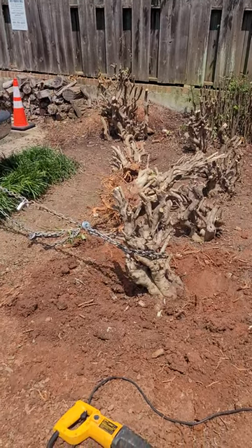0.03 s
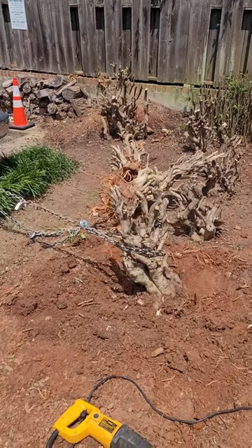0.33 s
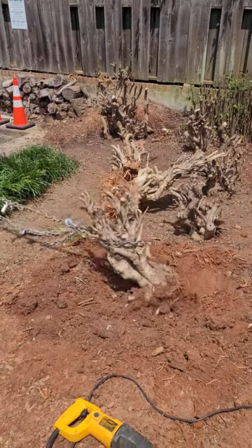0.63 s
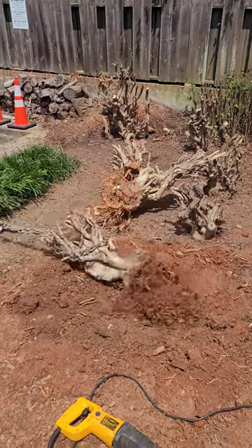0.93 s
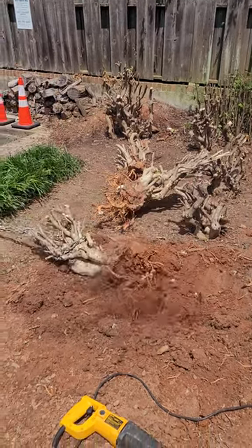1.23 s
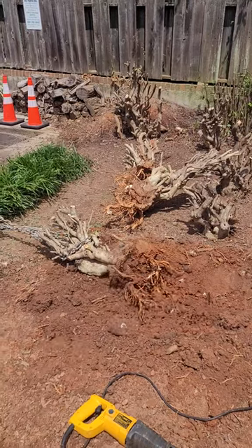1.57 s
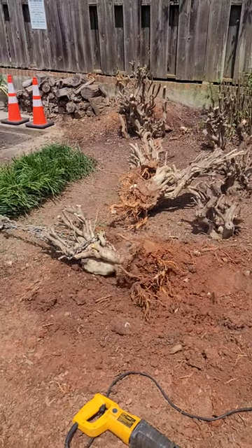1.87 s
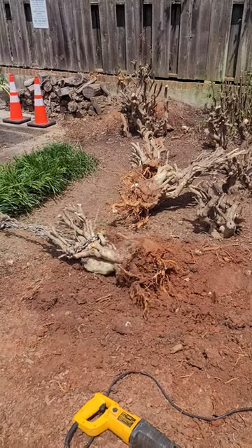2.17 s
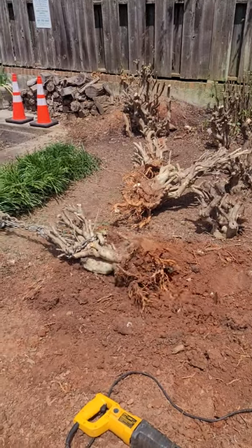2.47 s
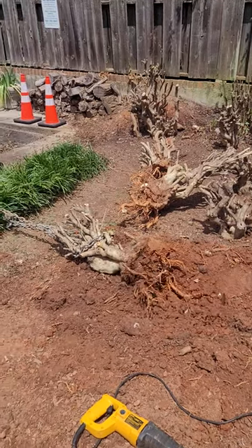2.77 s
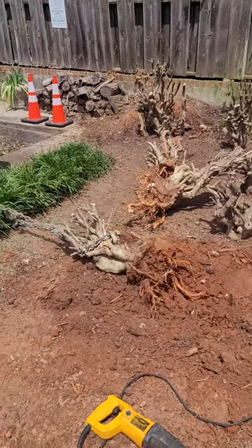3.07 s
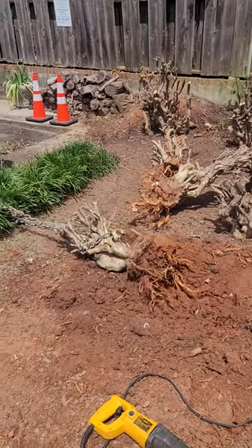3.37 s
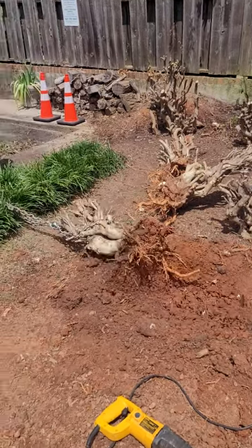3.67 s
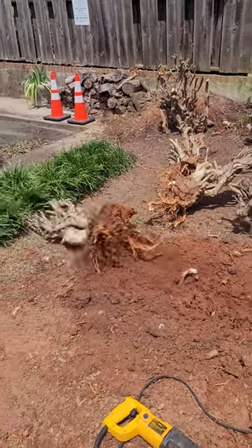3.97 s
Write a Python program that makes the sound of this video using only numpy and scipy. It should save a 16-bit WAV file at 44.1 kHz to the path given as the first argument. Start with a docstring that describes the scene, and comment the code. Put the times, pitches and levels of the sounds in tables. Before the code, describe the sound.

A stump rips out of dry earth in a yard, roots snapping and dirt spraying over a low engine rumble. The engine eases, then revs again, bringing a second, shorter burst of cracking and falling soil.

```python
"""A vehicle drags a stump out of dry clay on a chain, in a fenced yard. The exhaust booms as the
engine begins the first of four surges. Strained roots snap and tear, twigs click, the trunk knocks
and the root ball heaves; clods crumble, soil sprays down, the chain jingles and the stump scrapes
to rest. After a lull the engine pulls again, more roots break, and the chain jingles as the stump
comes free. Throughout, the wooden fence returns a faint, short reflection of the stump's sounds."""
import sys
import numpy as np
from scipy import signal
from scipy.fft import rfft, irfft, next_fast_len
from scipy.io import wavfile
from scipy.ndimage import map_coordinates

SR = 44100
rng = np.random.default_rng(int(sys.argv[2]) if len(sys.argv) > 2 else 0)


def bounce(signal):
    """Save signal as a 16-bit WAV file at the path given by the first command-line argument."""
    frames = np.transpose(np.atleast_2d(signal))
    limited = np.clip(frames, -1, 1)
    pcm = np.round(limited * 32767).astype(np.int16)
    wavfile.write(sys.argv[1], SR, pcm)


N = 4 * SR


# roots breaking, with a level for each band: start_s, thump_db, wood_db, snap_db, splinter_db
ROOT_SNAPS = [(0.477,-50,-22,-36.5,-46), (0.5275,-25,-19.5,-27.5,-48), (0.595,-27,-33.5,-28,-38),
              (0.6234,-54,-28.5,-28.5,-44), (0.642,-28.5,-24,-37.5,-54), (0.709,-60,-32,-30,-33),
              (0.7829,-24,-20.5,-25.5,-27.5), (0.879,-32,-23.5,-32,-38), (0.9585,-52,-24.5,-38,-39),
              (1.469,-53,-40.5,-37,-44.5), (2.69,-61,-26.5,-23.5,-27), (2.7111,-27,-30.5,-43,-53),
              (3.3489,-38,-40,-32.5,-31), (3.5902,-24.5,-27,-40,-30), (3.625,-36,-50,-27,-20.5),
              (3.892,-58,-45,-42.5,-27.5)]
def roots(fibres=7):
    """Brittle fracture: a root sheds its strain in one impulse, then fibres part and a tear dies away."""
    out, t = np.zeros((2, N)), np.arange(SR // 10) / SR
    tear_db, tear_decay_s, fibre_delay_s, left_lag_s = -8, .0039, .00082, .00005
    level_window_s = .0104
    bands_hz = [(200, 800), (800, 2400), (2400, 8000), (8000, 16000)]
    filters = [signal.butter(3, band, "band", fs=SR, output="sos") for band in bands_hz]
    for start_s, *levels_db in ROOT_SNAPS:
        burst = amp(tear_db) * np.exp(-t / tear_decay_s) * rng.standard_normal((2, len(t)))
        delays_s = np.append(0, rng.exponential(fibre_delay_s, fibres)) + np.array([[left_lag_s], [0]])
        sizes = np.append(-1, .52 * rng.uniform(-3.35, 1, fibres))
        sizes = sizes * amp(.75 * rng.standard_normal(delays_s.shape))
        offsets = np.clip(delays_s * SR, 0, len(t) - 1).astype(int)
        burst += [np.bincount(at, size, len(t)) for at, size in zip(offsets, sizes)]
        for k, (sos, level_db) in enumerate(zip(filters, levels_db)):
            band = signal.sosfilt(sos, burst if k else burst.mean(0, keepdims=True))  # mono thump
            rms = np.sqrt(np.mean(band ** 2, 0).sum() / (level_window_s * SR))
            add(out, start_s, (-1) ** k * amp(level_db) * band / rms)
    return out


# knocks of the trunk: start_s, pitch_hz, level_db
KNOCKS = [(.528, 432, -16), (.879, 408, -13.5), (.958, 270, -15.5), (3.581, 392.7, -16),
          (3.669, 324, -15.5)]
def trunk(t60_s=.047):
    """Damped free vibration: each jerk excites one hollow-sounding mode of the heavy stump."""
    out, t = np.zeros((2, N)), np.arange(SR // 10) / SR
    for start_s, pitch_hz, level_db in KNOCKS:
        add(out, start_s, amp(level_db - 60 * t / t60_s) * np.sin(2 * np.pi * pitch_hz * t)[None])
    return out


# thin roots and twigs clicking: start_s, level_db
TWIG_CLICKS = [(.333, -26), (.493, -22), (.672, -24), (.69, -28), (.729, -25), (.766, -22), (.937, -30),
               (1.01, -24.5), (1.03, -28), (1.054, -23), (1.141, -25), (1.238, -34), (1.313, -31),
               (1.323, -30), (1.363, -31), (3.511, -19), (3.548, -27), (3.669, -23)]
# spectrum of a click: frequency_hz, gain_db
TWIG_SPECTRUM = [(400, -3.5), (1900, 3.5), (4500, -4), (16000, -25)]
def twigs(decay_s=.005, median_hz=1900):
    """Impulse response: each twig clicks and rings for an instant at its own natural frequency."""
    out, t = np.zeros((2, N)), np.arange(SR // 20) / SR
    grit = coloured(stereo_noise(), TWIG_SPECTRUM)
    decay = np.exp(-t / decay_s)
    for start_s, level_db in TWIG_CLICKS:
        pitch_hz = median_hz * np.exp(.25 * rng.standard_normal())
        ring = 1.2 * np.sin(2 * np.pi * pitch_hz * t + rng.random((2, 1))) * decay
        click = grit[:, round(start_s * SR):][:, :len(t)]
        add(out, start_s, amp(level_db) * decay * (click + ring))
    return out


# clods and rootlets breaking up: time_s, level_db
CRUMBLE = [(.57, -61), (.61, -33.5), (1.03, -35), (1.1, -62), (1.15, -41), (1.32, -47), (1.42, -58.5),
           (3.15, -53), (3.48, -37), (3.66, -29.5), (3.74, -47)]
# spectrum of the crumbling: frequency_hz, gain_db
CRUMBLE_SPECTRUM = [(100, 3.5), (1100, 0), (1900, -1), (5500, -22), (16000, -22)]
# fine soil spraying: time_s, level_db
SPRAY = [(.55, -58), (.7, -40), (.97, -36.5), (1.09, -58), (1.13, -37), (1.2, -37.5), (1.42, -70),
         (3.1, -66), (3.35, -40), (3.64, -36), (3.71, -49), (4, -43.5)]
# spectrum of the spray: frequency_hz, gain_db
SPRAY_SPECTRUM = [(1000, -13), (4000, 7), (8000, 0), (12500, 6.5), (16000, 5)]
def soil():
    """Superposition of random ticks: breaking clods and rootlets crackle, the denser spray hisses."""
    crumble_db, = curves(CRUMBLE)
    spray_db, = curves(SPRAY)
    rootlets = grains(per_second=1800, scatter_db=4.5, quality=4)
    crumbs = grains(per_second=12000, scatter_db=3, quality=7)
    crumble = amp(crumble_db + 1.2 * wobble(110)) * coloured(rootlets, CRUMBLE_SPECTRUM)
    spray = amp(spray_db + 3.3 * wobble(60)) * coloured(crumbs, SPRAY_SPECTRUM)
    return crumble + spray


# heaves of the root ball: peak_s, width_s, level_db
HEAVES = [(.89, 0.13, -29), (3.63, 0.088, -31)]
def root_ball():
    """Amplitude modulation: a low band of noise swells and fades as the root ball heaves."""
    envelope = sum(amp(level_db) * swell(peak_s, width_s) for peak_s, width_s, level_db in HEAVES)
    return envelope * noise_band(centre_hz=224, width_hz=280)


def scrape(start_s=1.387, decay_s=.048, centre_hz=1037, level_db=-36.5):
    """Sliding friction: a band of noise decays as the stump comes to rest."""
    t = np.arange(N) / SR - start_s
    envelope = amp(level_db) * (t > 0) * np.exp(-abs(t) / decay_s)
    return envelope * noise_band(centre_hz, centre_hz / 2)


# jingles of the chain: start_s, length_s, tap_level_db
JINGLES = [(1.02, .19, -43), (3.823, .16, -44)]
def chain(taps=64, mean_hz=14750, t60_s=.016):
    """Impact excitation: slack links tap each other and each rings at its own natural frequency."""
    out, t = np.zeros((2, N)), np.arange(SR // 10) / SR
    for start_s, length_s, level_db in JINGLES:
        for k in range(taps):
            pitch_hz = mean_hz * (1 + .028 * rng.standard_normal())
            ring = np.sin(2 * np.pi * (pitch_hz * t + rng.random((2, 1))))
            tap_s = start_s + length_s * (k + rng.random()) / taps
            add(out, tap_s, amp(level_db - 60 * t / t60_s) * ring)
    return out


# firing tone of the engine: time_s, firing_hz, fundamental_db, third_harmonic_db
FIRING = [(.12, 58.76, -49.5, -58), (.24, 65.93, -29, -42), (.35, 78.73, -20.5, -30.5),
          (.44, 82.34, -27, -44.5), (.63, 76.94, -26.5, -26), (.75, 67.54, -42, -49),
          (1.15, 53.5, -63, -60), (2.15, 55.95, -47.5, -77), (2.36, 69.97, -28.5, -34.5),
          (2.52, 72.05, -29, -36.5), (2.62, 66.2, -42.5, -46), (2.88, 63.5, -40, -52), (3, 75.53, -23, -24),
          (3.18, 77.83, -23, -25), (3.37, 90.92, -32.5, -63), (3.7, 86.2, -33, -52.5),
          (3.91, 74.9, -27, -26), (4, 66.2, -41, -47)]
# noise of the engine under load: time_s, roar_gain_db, fan_db
LOAD = [(.12, -48.5, -53.5), (.19, -41, -43.5), (.38, -33, -38.5), (.7, -36, -36.5), (1.2, -44.5, -40.5),
        (1.55, -46, -52.5), (2.05, -48, -52.5), (2.42, -36.5, -42), (2.75, -39.5, -46.5), (3.3, -31.5, -40),
        (4, -37, -42.5)]
def engine(cylinders=6):
    """Periodic excitation: cylinders of unequal strength fire in turn, giving harmonics and puffs."""
    firing_hz, fundamental_db, third_db = curves(FIRING)
    roar_db, fan_db = curves(LOAD)
    cycles = np.cumsum(firing_hz * (1 + .006 * wobble(40))) / SR
    phase = 2 * np.pi * cycles
    fundamental = amp(fundamental_db + wobble(45)) * np.sin(phase)
    third = amp(third_db + wobble(45)) * np.sin(3 * phase)
    firings = np.floor(cycles).astype(int)
    cylinder_db = np.take(3 * rng.standard_normal(cylinders), firings, mode="wrap")
    pulses = np.diff(firings, prepend=0) * amp(cylinder_db + 2 * rng.standard_normal(N))
    puffs = stereo_noise() * (1 + .5 * np.cos(phase))
    pipe = exhaust(pulses, puffs, roar_db, fundamental_db)
    return np.sqrt(2) * (fundamental + third) + pipe + intake(puffs, fundamental_db) + fan(phase, fan_db)


# response of the exhaust pipe: frequency_hz, gain_db
PIPE_SPECTRUM = [(20, -96.5), (38, 3.5), (120, 9), (180, 1), (330, 3), (470, -7.5), (560, -26),
                 (850, -21.5), (1200, -42), (3000, -102)]
# booms as the throttle opens: peak_s, level_db
BOOMS = [(0.192, -26.5), (2.245, -25.5)]
def exhaust(pulses, puffs, roar_db, fundamental_db, boom_hz=119.9, boom_width_s=.029):
    """Source and filter: the booming pipe shapes pulses and puffs; upper harmonics rise under load."""
    throb = coloured(pulses, PIPE_SPECTRUM)
    roar = amp(roar_db) * (amp(-2) * throb + amp(4) * coloured(puffs, PIPE_SPECTRUM))
    overtones = amp(fundamental_db - 19) * unit(filtered(throb, lambda hz: hz > 299.6))
    envelope = sum(amp(level_db) * swell(peak_s, boom_width_s) for peak_s, level_db in BOOMS)
    boom = envelope * np.sin(2 * np.pi * boom_hz * np.arange(N) / SR)
    return roar + overtones + boom


# resonances of the intake: pitch_hz, gain_db
INTAKE_MODES = [(664, -1.5), (790, -4), (862, -0.5)]
def intake(puffs, fundamental_db, bandwidth_hz=3.3, relative_db=-23.5):
    """Forced resonance: the puffs drive narrow modes into a drone that follows the firing tone's level."""
    def response(hz):
        return sum(amp(db) / (1 + 2j * (hz - mode_hz) / bandwidth_hz) for mode_hz, db in INTAKE_MODES)
    return amp(fundamental_db + relative_db) * unit(filtered(puffs, response))


# spectrum of the fan: frequency_hz, gain_db
FAN_SPECTRUM = [(800, 3), (2000, -2.5), (4300, -7.5), (8500, -15.5)]
def fan(phase, level_db):
    """Broadband flow noise: the fan's rush swells with the throttle and pulses at the firing rate."""
    rush = coloured(stereo_noise(), FAN_SPECTRUM) * (1 + .12 * np.cos(phase))
    return amp(level_db + 1.6 * wobble(11)) * rush


def yard(x, t60_s=.12, rise_s=.0011, gain_db=-11):
    """Diffuse reflection: the fence and ground scatter a short, thin tail."""
    t = np.arange(SR // 2) / SR
    tail = rng.standard_normal((2, len(t))) * amp(-60 * t / t60_s) * (1 - np.exp(-t / rise_s))
    return amp(gain_db) * signal.fftconvolve(x, tail / np.linalg.norm(tail[0]), axes=1)[:, :N]


# likeness of left and right: frequency_hz, coherence
COHERENCE = [(300, 0.97), (950, 0.31), (4000, 0)]
def spread(pair):
    """Spatial coherence: two unrelated signals mix to left and right, alike at long wavelengths."""
    angle = lambda hz: np.arccos(np.clip(along(COHERENCE, hz), -1, 1)) / 2
    mid, side = filtered(pair, lambda hz: np.array([np.cos(angle(hz)), np.sin(angle(hz))]))
    return np.array([mid + side, mid - side])


def stereo_noise():
    """White noise, coherent in the bass."""
    return spread(rng.standard_normal((2, N)))


def noise_band(centre_hz, width_hz):
    """Noise through a Gaussian passband, at rms 1."""
    return unit(filtered(stereo_noise(), lambda hz: np.exp(-((hz - centre_hz) / width_hz) ** 2)))


def grains(per_second, scatter_db, quality):
    """Shot noise: damped ticks of random moment, pitch and size, with a random phase for each channel."""
    when, pitch, size, *phases = rng.random((per_second * N // SR, 5)).T[:, :, None]
    t = np.arange(256) / SR
    hz = 300 * 50 ** pitch  # 300 Hz to 15 kHz
    strength = amp(-scatter_db * np.maximum(np.log(size), -4)) * hz
    envelope = strength * np.exp(-t * hz * np.pi / quality)
    at = ((when * N).astype(int) + np.arange(len(t))).ravel()
    ticks = [envelope * np.sin(2 * np.pi * (hz * t + phase)) for phase in phases]
    return spread(np.array([np.bincount(at, channel.ravel(), N)[:N] for channel in ticks]))


def coloured(x, spectrum, size=8192):
    """Minimum-phase filtering of x to the given spectrum, at rms 1."""
    cepstrum = irfft(np.log(amp(along(spectrum, np.fft.rfftfreq(size, 1 / SR)))))
    cepstrum[1:size // 2] *= 2  # folding the cepstrum makes the filter causal
    cepstrum[size // 2 + 1:] = 0
    impulse = irfft(np.exp(rfft(cepstrum)))
    return unit(signal.fftconvolve(np.atleast_2d(x), impulse[None], axes=1)[:, :N])


def filtered(x, response):
    """Linear filtering: the spectrum of x times a frequency response."""
    size = next_fast_len(N + SR // 2)
    return irfft(rfft(x, size) * response(np.fft.rfftfreq(size, 1 / SR)), size)[..., :N]


def along(points, hz):
    """Interpolation of (frequency_hz, value) points on a log axis."""
    points_hz, values = np.transpose(points)
    return np.interp(np.log(hz + 1), np.log(points_hz + 1), values)


def curves(rows):
    """Linear interpolation: one value per sample for each column after the time."""
    times_s, *columns = np.transpose(rows)
    return [np.interp(np.arange(N) / SR, times_s, column) for column in columns]


def wobble(knots_per_s):
    """A smooth random fluctuation."""
    return map_coordinates(rng.standard_normal(4096), [np.arange(N) * knots_per_s / SR], mode="wrap")


def swell(peak_s, width_s):
    """A Gaussian envelope."""
    return np.exp(-.5 * ((np.arange(N) / SR - peak_s) / width_s) ** 2)


def amp(db):
    """Decibels to amplitude ratio."""
    return 10 ** (np.asarray(db) / 20)


def unit(x):
    """Normalisation to rms 1."""
    return x / np.sqrt(np.mean(x ** 2) + 1e-20)


def add(out, start_s, x):
    """Superposition of x on out from start_s."""
    i = max(round(start_s * SR), 0)
    out[:, i:i + x.shape[1]] += x[:, :N - i]


def scene():
    """Superposition: the stump's direct sound, its reflection in the yard, and the engine."""
    stump = roots() + twigs() + trunk() + soil() + root_ball() + scrape() + chain()
    return stump + yard(stump) + engine()


# peaks and dips of the microphones, the first a dip from the ground reflection: centre_hz, width_hz, gain_db
MIC_RESPONSE = [(583, 46, -2.5), (1160, 160, -2.5), (1910, 127, 0.5), (2635, 180, -2.5), (7620, 600, 3.5),
                (9100, 730, -4)]
# channel balance: frequency_hz, left_minus_right_db
BALANCE = [(500, -3), (2500, 1.5), (8000, -2)]
def record(dry, cutoff_hz=15900):
    """Transduction: the microphones and a ground reflection colour the sound, peaks clip at full scale and the
    top is cut."""
    def response(hz):
        colour_db = sum(db * np.exp(-((hz - centre) / width) ** 2) for centre, width, db in MIC_RESPONSE)
        return amp(colour_db + along(BALANCE, hz) * np.array([[.5], [-.5]]))
    clipped = np.clip(filtered(dry, response), -1, 1)
    return filtered(clipped, lambda hz: hz < cutoff_hz)


dry = scene()
out = record(dry)
bounce(out)
```